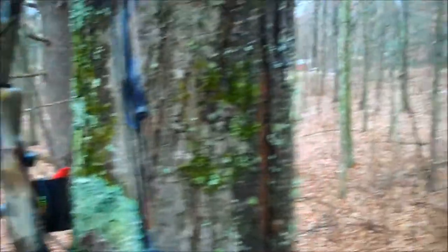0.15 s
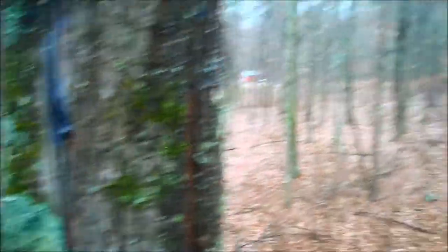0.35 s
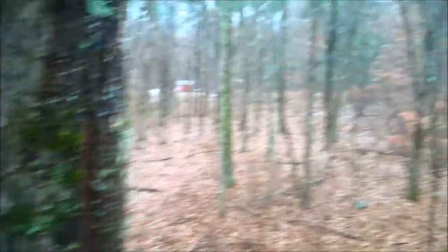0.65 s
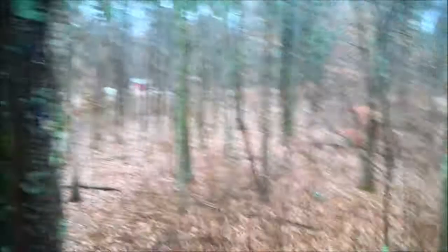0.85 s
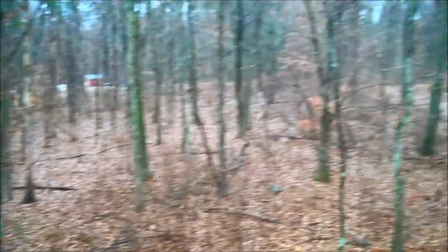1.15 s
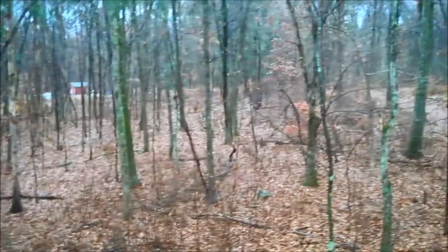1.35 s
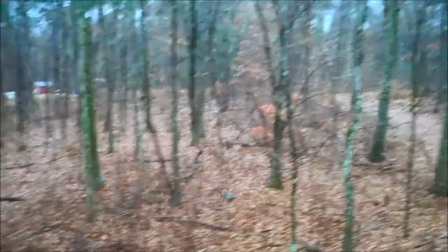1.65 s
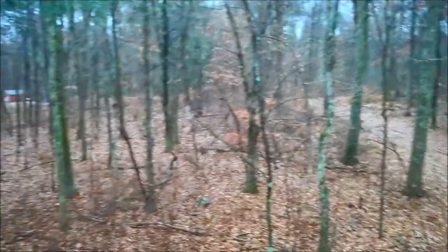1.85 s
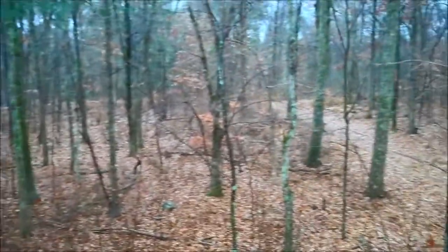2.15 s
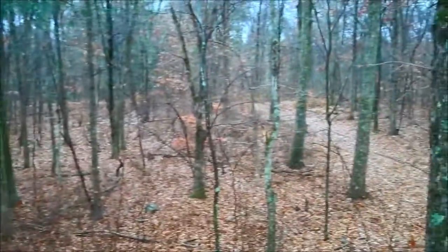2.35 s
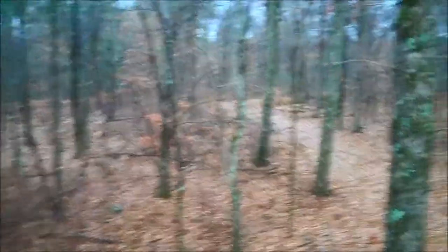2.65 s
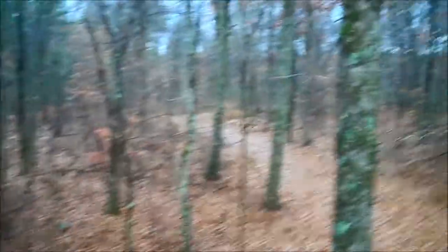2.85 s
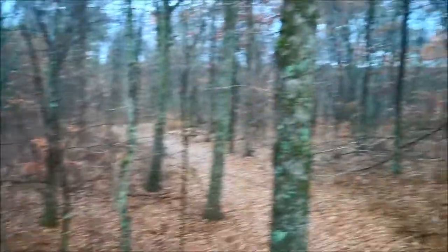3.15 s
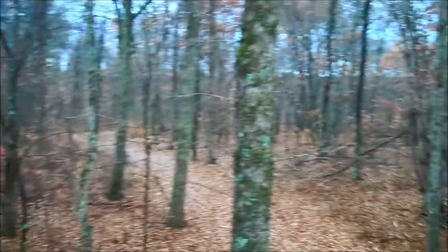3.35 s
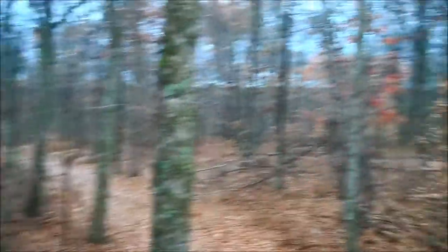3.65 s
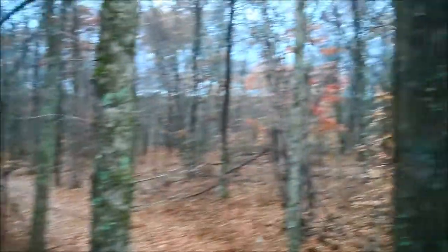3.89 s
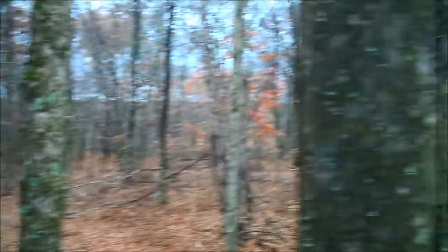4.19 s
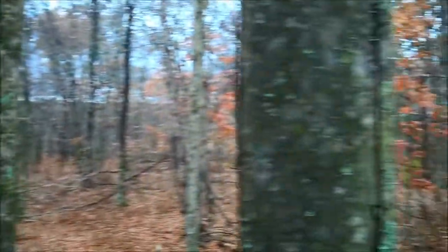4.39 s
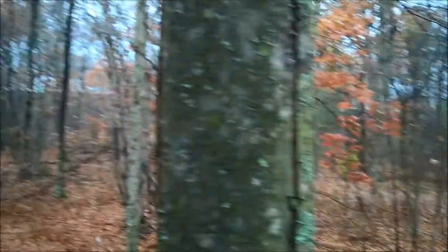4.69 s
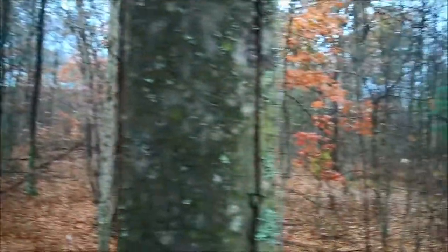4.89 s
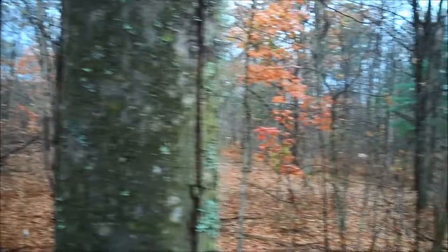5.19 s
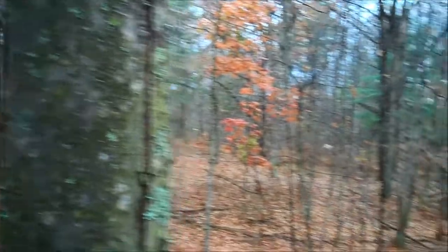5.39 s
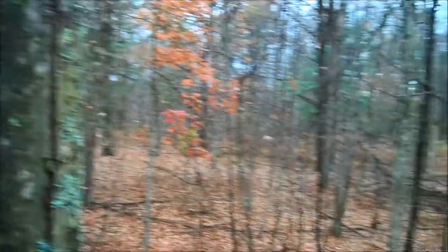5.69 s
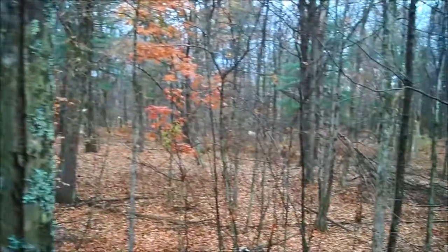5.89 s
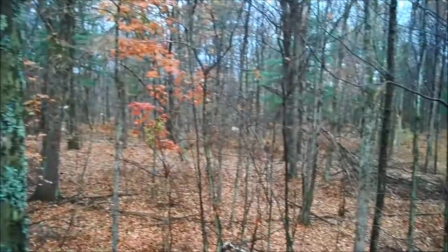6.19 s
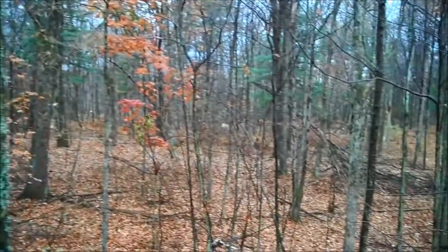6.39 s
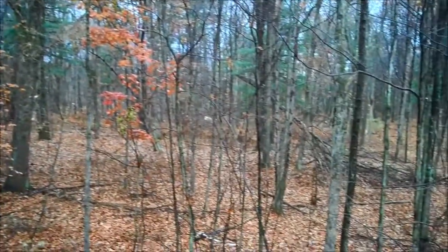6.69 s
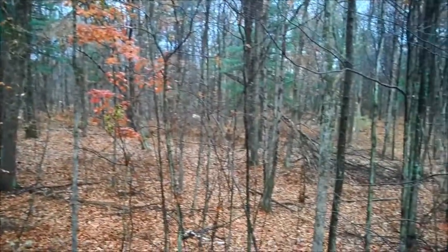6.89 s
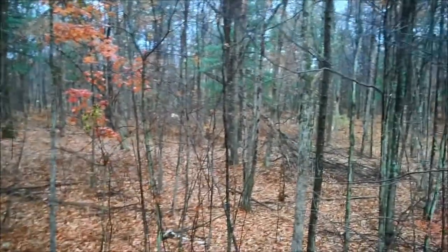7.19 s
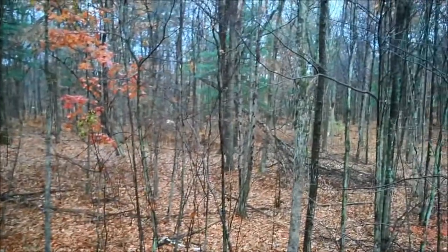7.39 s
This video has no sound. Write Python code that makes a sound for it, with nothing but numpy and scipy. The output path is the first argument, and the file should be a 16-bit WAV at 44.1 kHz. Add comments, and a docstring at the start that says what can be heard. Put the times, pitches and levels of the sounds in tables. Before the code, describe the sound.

Continuous soft rainfall on dry fallen leaves, a wide stereo hiss scattered with irregular taps, snaps and one loud drop past the middle.

```python
"""Steady rain in a bare wood, heard from a hand-held camera that turns slowly.
Countless far drops merge into a hiss on the leaf litter, made of third-octave bands of stereo noise.
Nearer drops patter, and the nearest tick, snap and pop: short clicks that set resonances ringing.
A few puffs of wind, swells of low noise, touch the microphones, whose two small ports ring in the treble."""
import sys
import numpy as np
from scipy import signal
from scipy.fft import rfft, irfft, next_fast_len
from scipy.io import wavfile

SR = 44100
rng = np.random.default_rng(int(sys.argv[2]) if len(sys.argv) > 2 else 0)


def int16_out(signal):
    """Quantize to a 16-bit WAV file."""
    q = np.round(np.clip(np.atleast_2d(signal).T, -1, 1) * 32767)
    wavfile.write(sys.argv[1], SR, q.astype(np.int16))


N = 332514

# Noise level of the far rain, which brightens as the camera turns: t/s, low wash level/dB, bright hiss level/dB
RAIN_LEVELS = [(0, -54, -52), (0.6, -52.5, -51.5), (0.95, -51.5, -50), (1.3, -54.5, -50.5),
               (1.65, -53, -51), (2.05, -51, -50.5), (2.3, -53.5, -50), (2.6, -54, -49), (3.1, -53.5, -50),
               (3.8, -55, -48.5), (4.75, -54, -49), (4.9, -54, -47.5), (5.2, -55, -47), (5.6, -55, -48.5),
               (6.3, -55, -48), (6.95, -54.5, -47.5), (7.15, -49.5, -47), (7.3, -52, -47),
               (7.54, -55, -47.5)]


def from_db(db):
    """Amplitude gain from a level: 20 dB is a factor of ten."""
    return 10 ** (np.asarray(db) / 20)


def rms_one(x):
    """Normalisation to unit root-mean-square amplitude."""
    return x / np.sqrt(np.mean(x ** 2) + 1e-20)


def in_time(rows):
    """Linear interpolation of each column against t/s, one value a sample."""
    t, *columns = np.transpose(rows)
    return [np.interp(np.arange(N) / SR, t, column) for column in columns]


def at_hz(points, hz):
    """Interpolation of a spectrum on a logarithmic frequency axis."""
    point_hz, values = np.array(points).T
    return np.interp(np.log(hz), np.log(point_hz), values)


def drift(corner_hz):
    """Slow random fluctuation of unit rms: white noise through a two-pole low-pass."""
    step = 40                                   # samples between computed values
    pole = np.exp(-2 * np.pi * corner_hz * step / SR)
    noise = rng.standard_normal(N // step + 2002)
    slow = signal.lfilter([1], [1, -2 * pole, pole * pole], noise)[2000:]   # the start-up is dropped
    return np.interp(np.arange(N) / step, np.arange(len(slow)), rms_one(slow))


def ring(excitation, hz, t60_s):
    """Damped resonance: a pole pair, with zeros that stop deep bass and extreme treble."""
    radius = from_db(-60 / (t60_s * SR))
    angle = 2 * np.pi * hz / SR
    return signal.lfilter([1, 0, -1], [1, -2 * radius * np.cos(angle), radius * radius], excitation)


def add(out, sound, t, level_db, pan_db, lag):
    """Stereo placing by level and arrival time: positive pan favours left, positive lag delays it."""
    for side, sign in enumerate((1, -1)):
        start = round(t * SR) + max(sign * lag, 0)      # lag in samples
        gain = from_db(level_db + sign * pan_db / 2)
        out[side, start:start + len(sound)] += gain * sound[:max(N - start, 0)]


def far_rain(patchy_db, flicker_db):
    """Diffuse field: noise bands of set left-right correlation, fluctuating together and alone."""
    # Colour of the rain in the open air, as relative spectral density: f/Hz, level/dB
    colour = [(20, -12), (40, 0.5), (70, 3), (130, 5), (300, 6.5), (600, 7.5), (1200, 6), (2400, 3.5),
              (4000, -1), (6000, -5), (8000, -11), (11000, -6), (15000, -33)]
    # Left-right correlation; sound from all around agrees at both ports mainly in the bass: f/Hz, coefficient
    likeness = [(30, 0.082), (60, 0.26), (130, 0.96), (380, 0.8), (940, 0.81), (2360, 0.6), (4000, 0.49),
                (7000, 0.12), (14800, 0.12)]
    wash_to_hiss_hz = 2280
    rumble_db, rumble_top_hz = -50.5, 248       # the distant roar follows neither wash nor hiss
    wash_db, hiss_db = in_time(RAIN_LEVELS)
    together = drift(7)
    white = rng.standard_normal((2, 2, N))      # neighbouring bands get unrelated noise
    edges_hz = 20 * 2 ** np.arange(0, 9.7, 1 / 3)
    out = 0
    for k, (low_hz, high_hz) in enumerate(zip(edges_hz, edges_hz[1:])):
        band = signal.butter(2, [low_hz, high_hz], "band", fs=SR, output="sos")
        mid, side = signal.sosfilt(band, white[k % 2])
        hz = np.sqrt(low_hz * high_hz)
        alike = at_hz(likeness, hz)
        bright = 1 / (1 + (wash_to_hiss_hz / hz) ** 4)
        level_db = (1 - bright) * wash_db + bright * hiss_db
        deep = 1 / (1 + (hz / rumble_top_hz) ** 4)
        level_db = deep * rumble_db + (1 - deep) * level_db
        shared_db = patchy_db * np.clip(hz / 600, 0, 1) * together      # the bass is less patchy
        unsteady_db = shared_db + flicker_db * drift(12.6)
        gain = from_db(level_db + at_hz(colour, hz) + unsteady_db)
        out = out + gain * (np.sqrt(1 + alike) * mid + np.sqrt(1 - alike) * side * [[1], [-1]])
    return out


def splat(pop_hz, pop_db, tap_hz, tap_db, splash_hz, splash_db, burst_t60_s):
    """Impact excitation: a drop bursts into droplets that ring the hollow under the leaf and the leaf."""
    leaf_low_hz = 175                           # a leaf is too small to radiate below this
    ping_hz, ping_t60_s = 5250, 0.0059          # high taps ring on a little
    t = np.arange(1800) / SR
    burst = rng.standard_normal((2, len(t))) * from_db(-60 * t / np.clip(burst_t60_s, .004, .08))
    droplets = (rng.random(len(t)) < 2500 / SR) * burst[0] * 0.28      # 2500 chances a second
    droplets[0] = 1                             # the first blow
    contact = signal.lfilter([1], [1, -.7], droplets)   # a drop flattens softly

    # mainly the first blow fills the hollow
    push = signal.lfilter([1], [1, -.8], contact * np.exp(-t / 0.0029))
    pop = ring(push, pop_hz, 7.4 / pop_hz)

    tap_t60_s = 5.0 / tap_hz + ping_t60_s * (tap_hz / ping_hz) ** 6
    tap = -ring(contact * np.exp(-t / 0.006), tap_hz, tap_t60_s)

    spray = 0.1 * burst[1] + droplets
    crack = 3.07 * np.diff(spray, prepend=0)    # sharp, on top of the ringing
    splash = ring(spray, splash_hz, 4.7 / splash_hz) + crack

    whole = 0
    for level_db, part in ((pop_db, pop), (tap_db, tap), (splash_db, splash)):
        start_rms = np.sqrt(np.mean(part[:441] ** 2))   # over the first 10 ms
        whole = whole + from_db(level_db) * part / start_rms
    return signal.sosfilt(signal.butter(2, leaf_low_hz, "high", fs=SR, output="sos"), whole)


def patter(level_db, spread_db, clump_db, count=3000):
    """Random superposition: drops a few steps away at chance moments, small ones many, in surges."""
    out = np.zeros((2, N))
    surge_db = clump_db * drift(7.9)
    kinds = []
    for a, b, c, d, e, f in rng.random((80, 6)):
        pop_hz, pop_db = 400 * 5.05 ** a, -6.0 + 14 * (b - .5)
        tap_hz, tap_db = 1700 * 2.44 ** c, -3.0 + 14 * (d - .5)
        splash_hz, burst_t60_s = 4800 * 2.55 ** f, 0.0052 + 0.013 * e
        kinds.append(splat(pop_hz, pop_db, tap_hz, tap_db, splash_hz, -0.5, burst_t60_s)[:800])
    for when, size, kind, side in rng.random((count, 4)):
        size_db = -spread_db * np.log(size + 1e-9) + surge_db[int(when * N)]
        sound = kinds[int(kind * len(kinds))]
        across = side - .5                      # one draw sets both balance and lag
        add(out, sound, when * N / SR, level_db + min(size_db, 11.0), 8 * across, int(16 * across))
    return out


def fine_ticks(level_db, spread_db):
    """Poisson-like impulses: fine spray on the leaves, each a click and a dying puff of bright noise."""
    ticks_per_s, tick_t60_s = 150, 0.013
    low_hz, high_hz = 1970, 8300
    born = rng.random(N) < ticks_per_s / SR
    size_db = spread_db * np.minimum(rng.exponential(1, N), 3.0)
    balance_db = 3.0 * rng.uniform(-1.7, 1, N) * [[1], [-1]]
    clicks = born * from_db(size_db + balance_db)
    puffs = signal.lfilter([1], [1, -from_db(-60 / (tick_t60_s * SR))], clicks + 1e-18)
    noise = rng.standard_normal((2, N)) + 0.83 * rng.standard_normal(N)     # partly common to both sides
    band = signal.butter(2, [low_hz, high_hz], "band", fs=SR, output="sos")
    return from_db(level_db) * rms_one(signal.sosfilt(band, puffs * noise + 4.3 * clicks))


def snaps():
    """Impulse response: single clicks into a short ring, for small drops and cracks of the biggest."""
    # Snaps: t before delay_s/s, click level before the trim/dB, f/Hz, left-right level/dB
    clicks = [(0.0727, -30.5, 2270, -0.5), (0.2198, -27, 4940, -1.0), (0.707, -32, 2200, 0),
              (0.8714, -34, 5090, 2), (1.035, -29, 2060, -3), (1.1488, -31, 5050, -1),
              (1.5204, -36, 2540, 2.0), (1.738, -32, 5500, 0.5), (2.6549, -30, 3570, 0.0),
              (3.295, -32, 5470, 1), (3.4206, -28, 2250, -3), (3.4344, -40, 3260, -0.5),
              (3.4927, -38, 4270, -3), (3.5603, -34, 4500, -0.5), (3.585, -29, 5430, 2),
              (3.7115, -30, 2400, 0), (3.7175, -29, 7500, 5), (3.7245, -33, 2800, 0),
              (3.7609, -38, 5360, 0.0), (3.7935, -30, 4200, 1), (3.928, -32, 2400, 1.5),
              (4.1122, -25.5, 6200, 0.5), (4.148, -37, 5400, 0.5), (4.258, -29, 2540, 1.0),
              (4.278, -31, 4420, 1.0), (4.3187, -29, 3760, 1.0), (4.63, -27, 5250, 0.0),
              (4.7102, -38, 5490, 2), (4.834, -11.5, 9100, 4.5), (4.8343, -16, 4200, 2),
              (5.0265, -21, 8500, 6), (5.4293, -28, 4500, 2), (5.542, -37, 2650, 2.0),
              (5.7399, -32, 5440, 4), (5.9234, -30, 5460, -2), (5.9365, -32, 6500, 4),
              (6.0566, -22.5, 4500, 4), (6.2622, -35, 2420, 2.0), (6.3594, -40, 3330, -1),
              (6.4038, -32, 5210, 0.5), (6.4597, -30, 5330, 1.0), (7.144, -31, 7000, 1),
              (7.163, -28, 6800, 4)]
    t60_cycles, trim_db = 4, -8.5               # trimmed because the ports lift a snap's treble
    delay_s = 0.000943                          # every snap starts this long after its listed t
    out = np.zeros((2, N))
    impulse = np.eye(1, 300)[0]
    for t, click_db, hz, pan_db in clicks:
        sound = ring(impulse, hz, t60_cycles / hz)
        add(out, sound, t + delay_s, click_db + trim_db, pan_db, -round(pan_db / 2))
    return out


def near_drops():
    """Impacts with their own resonances: a big drop takes several rows, for blow, added rings and tail."""
    # Parts of the nearest drops, levels as rms over the first 10 ms ahead of leaf high-pass, balance and ports:
    # t/s, hollow pop f/Hz, pop level/dB, leaf tap f/Hz, tap level/dB, splash level/dB, left-right level/dB
    impacts = [(0.61, 1360, -65, 2030, -49, -69, -1), (0.652, 1430, -74, 5800, -61, -51, -5),
               (0.6542, 1430, -72, 4540, -58, -53, -3), (0.6585, 900, -72, 5900, -60, -49, 1),
               (0.665, 900, -74, 5900, -62, -53, -2), (0.67, 900, -72, 5900, -60, -57, 0),
               (0.819, 1500, -55, 2500, -64, -59, -1), (0.8433, 730, -63, 2090, -53, -53, 0),
               (0.8465, 730, -70, 4500, -64, -52, 1), (0.9032, 1360, -71, 4400, -71, -53, 11),
               (1.116, 1690, -70, 4300, -67, -48, 6.5), (1.207, 1400, -55, 2500, -64, -54, 5),
               (1.439, 710, -59, 4050, -56, -70, -1), (1.564, 1580, -54, 4400, -58, -50, 1),
               (1.78, 1150, -39.5, 3900, -54, -58, -1), (1.7822, 1150, -46, 2000, -62, -66, 1),
               (1.7872, 1200, -60, 5600, -66, -62, 5), (1.823, 1500, -55, 2000, -57, -49.5, 1),
               (2.1392, 1200, -50.5, 4360, -61, -55, 0.5), (2.266, 1280, -54, 4510, -58, -55, -5),
               (2.568, 1510, -54, 2610, -58, -68, -3), (2.7327, 1510, -65, 4350, -61, -54.5, 10.5),
               (2.7954, 1060, -69, 2850, -53, -64, -2.5), (2.873, 520, -65, 3920, -72, -56, 8),
               (2.941, 1000, -52, 1700, -58, -69, 0), (3.014, 790, -52, 1720, -50.5, -46.5, 4),
               (3.015, 900, -69, 3120, -49, -59, 2), (3.02, 890, -53, 5840, -60, -50, -5),
               (3.025, 900, -62, 5400, -64, -53, -8), (3.062, 900, -66, 4000, -58, -60, 0),
               (3.161, 490, -50.5, 2000, -66, -66, 0), (3.1827, 866, -46.5, 1900, -56, -50, 3),
               (3.191, 990, -53, 2500, -62, -56, 1), (3.5777, 3100, -54, 5100, -49.5, -53, 1),
               (3.611, 900, -55, 4600, -55, -53, 3), (3.647, 1290, -58, 4450, -66, -49, 4.5),
               (3.7942, 1680, -52, 2200, -56, -52.5, 0.5), (4.0131, 1000, -61, 2870, -58, -49, 7),
               (4.0975, 680, -48.5, 1560, -49, -63, 0), (4.1131, 900, -68, 2130, -62, -62, 0),
               (4.2246, 560, -74, 3540, -50, -70, 0.5), (4.265, 805, -51.5, 2520, -50, -54.5, 4),
               (4.358, 1430, -64, 1940, -53, -54, 9), (4.362, 1000, -55, 2300, -51, -51.5, 3),
               (4.499, 950, -61, 4300, -65, -50, 2), (4.5989, 432, -48, 2120, -48, -65, 2),
               (4.8345, 417, -35, 5220, -36.5, -47, -1), (4.8345, 646, -29, 2200, -40, -46, -2),
               (4.8352, 1700, -47, 3040, -30.5, -52, -3), (4.838, 490, -50, 2210, -37.5, -49, 7),
               (4.845, 397, -50, 2200, -57, -51, 7), (4.87, 450, -54, 2000, -64, -64, -1),
               (4.8902, 640, -56, 4860, -52, -63, 3), (4.8984, 1520, -57, 3530, -55, -55, 4),
               (5.0275, 950, -48, 2570, -42.5, -51, 1), (5.0272, 1210, -64, 5830, -47, -48, -1),
               (5.317, 330, -63, 2580, -66, -50, 1), (5.341, 810, -55, 2050, -51.5, -51, -1.5),
               (5.4368, 880, -44.5, 1950, -55, -52, 0), (5.4379, 1100, -62, 2000, -54, -53, 1),
               (5.457, 1680, -67, 2300, -52, -49.5, 0), (5.691, 1230, -49.5, 4420, -57, -62, -2),
               (5.8347, 1510, -45, 1670, -61, -48, 4.5), (5.91, 1090, -56, 4440, -66, -54, -2),
               (5.9393, 1920, -53, 5770, -49, -45, 0.5), (5.99, 1300, -54, 3000, -55, -49, 2.5),
               (6.009, 500, -57, 1800, -51, -64, 3), (6.0217, 493, -45.5, 1800, -48.5, -60, -2),
               (6.0571, 1950, -57, 3300, -45.5, -52, 1.5), (6.14, 1690, -73, 3160, -54, -51, 0),
               (6.548, 520, -63, 2450, -54, -63, 0.5), (6.599, 1400, -60, 3370, -58, -49.5, 7),
               (6.7342, 617, -48.5, 1590, -48, -48, 2.5), (6.961, 1690, -56, 4560, -53, -50, 4.5),
               (7.082, 950, -57, 2000, -66, -60, 5), (7.1068, 1850, -48, 2200, -61, -46, 6),
               (7.147, 950, -51, 1900, -62, -56, 1), (7.155, 1630, -58, 3020, -52, -54, 4),
               (7.2436, 600, -48, 1200, -52, -48, 3), (7.2694, 620, -55, 1970, -56, -43, 4.5)]
    splash_centre_hz, splash_hz_per_db = 5380, 170      # brighter from the left, where the port rings higher
    burst_t60_s = 0.037
    left_lead_s = 7e-5          # near drops fall in front: at even balance both ports hear them together
    out = np.zeros((2, N))
    for t, *body, splash_db, pan_db in impacts:
        splash_hz = splash_centre_hz + splash_hz_per_db * pan_db
        sound = splat(*body, splash_hz, splash_db, burst_t60_s)
        add(out, sound, t, 0, pan_db, -round(pan_db / 2 + left_lead_s * SR))
    return out


def wind():
    """Turbulent pressure: low noise, mostly separate at each port, swells quickly and dies away."""
    # Puffs of wind on the ports: t of peak/s, level/dB, left-right level/dB
    gusts = [(1.282, -57, -19), (1.378, -56, 11), (1.402, -59, 8), (1.466, -59, -10), (1.505, -58, -12),
             (1.55, -59, -13), (1.628, -68, 2), (1.7, -60, -5), (1.89, -64, 5)]
    rise_s, fall_s = 0.012, 0.024               # exponential time constants
    noise = rng.standard_normal((2, N)) + 0.47 * rng.standard_normal(N)
    low = signal.sosfilt(signal.butter(2, [15, 80], "band", fs=SR, output="sos"), noise)
    t = np.arange(N) / SR
    blowing = 0
    for peak_s, level_db, pan_db in gusts:
        shape = np.exp(-np.maximum((peak_s - t) / rise_s, (t - peak_s) / fall_s))
        puff = shape * low
        strength = np.sqrt(np.sum(puff ** 2, axis=1, keepdims=True) / np.sum(shape ** 2))
        gain = from_db(level_db + pan_db * np.array([[.5], [-.5]]))
        blowing = blowing + gain * puff / strength
    return blowing


def scene():
    """Linear superposition of all layers in the air before the ports."""
    far = far_rain(patchy_db=0.74, flicker_db=0.96)
    hiss_db = in_time(RAIN_LEVELS)[1]
    nearby = patter(level_db=-24, spread_db=5.0, clump_db=2.0) + fine_ticks(level_db=-16.5, spread_db=1.5)
    nearby = from_db(hiss_db) * nearby          # their levels are relative to the far hiss
    return far + nearby + snaps() + near_drops() + wind()


def record(dry):
    """Cavity resonance: each port is flat below, peaks and falls above; then self-noise and a treble cut."""
    # Microphone ports, left then right: resonance f/Hz, bandwidth/Hz, level/dB, mesh low-pass f/Hz
    cavities = [(7140, 990, -0.5, 10000), (5860, 1090, -1, 9300)]
    left_lag_s = 7e-5                           # the left port sits further from the rain
    self_noise_db, cutoff_hz = -61.5, 14200     # noise rms before the cut
    out = np.zeros_like(dry)
    for side, (hz, width_hz, gain_db, mesh_hz) in enumerate(cavities):
        radius = np.exp(-np.pi * width_hz / SR)
        poles = [1, -2 * radius * np.cos(2 * np.pi * hz / SR), radius * radius]
        resonant = from_db(gain_db) * signal.lfilter([np.sum(poles)], poles, dry[side])
        out[side] = signal.lfilter(*signal.butter(1, mesh_hz, fs=SR), resonant)
    size = next_fast_len(N)
    later = np.exp(-2j * np.pi * np.fft.rfftfreq(size, 1 / SR) * left_lag_s)    # phase of a pure delay
    out[0] = irfft(rfft(out[0], size) * later, size)[:N]
    out = out + from_db(self_noise_db) * rng.standard_normal(out.shape)
    return signal.sosfilt(signal.ellip(12, .5, 50, cutoff_hz, fs=SR, output="sos"), out)


dry = scene()
out = record(dry)
int16_out(out)
```